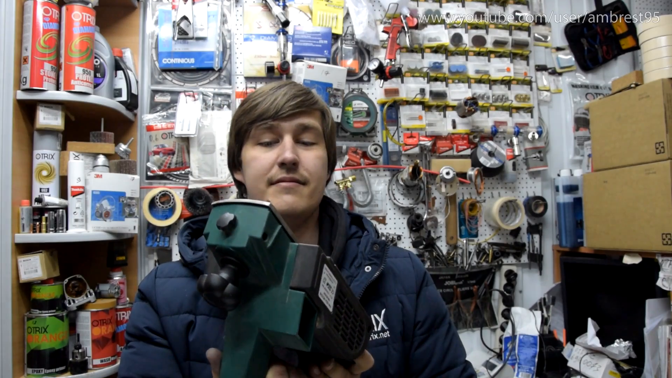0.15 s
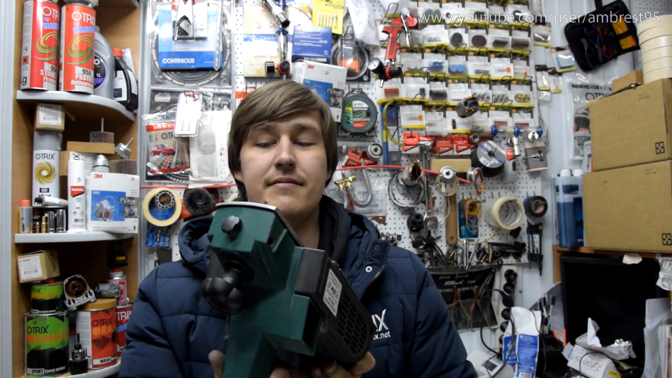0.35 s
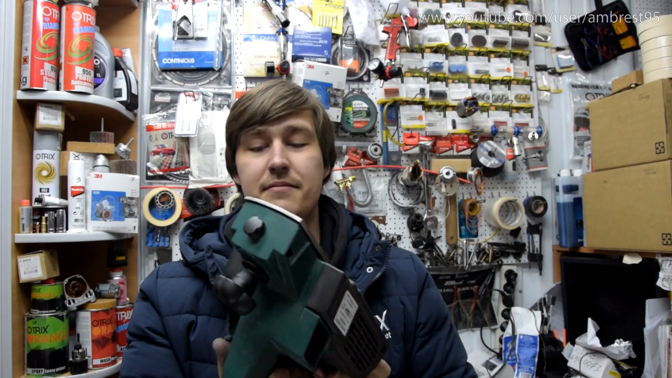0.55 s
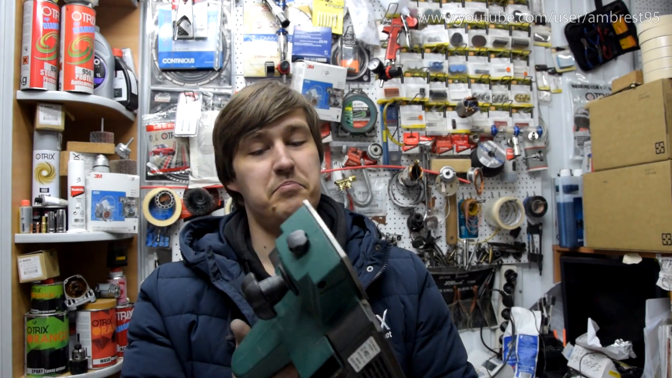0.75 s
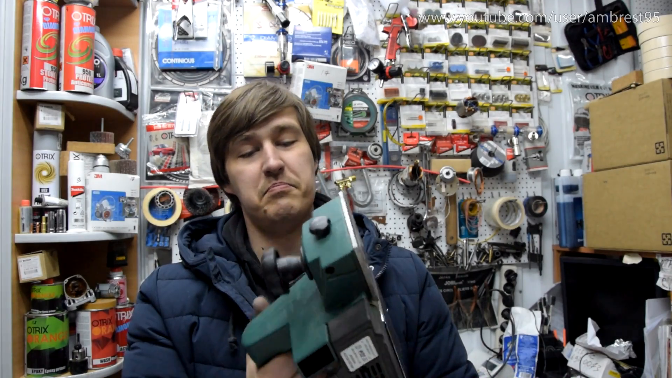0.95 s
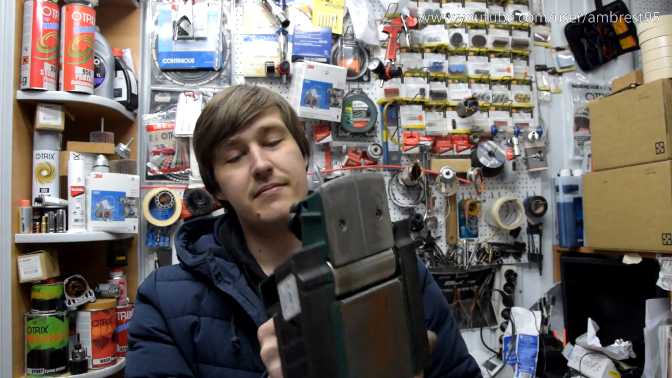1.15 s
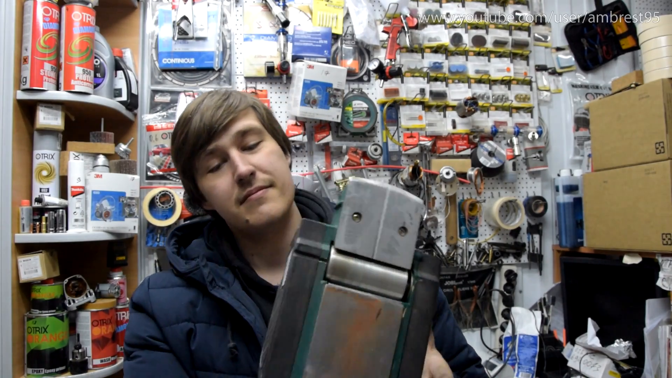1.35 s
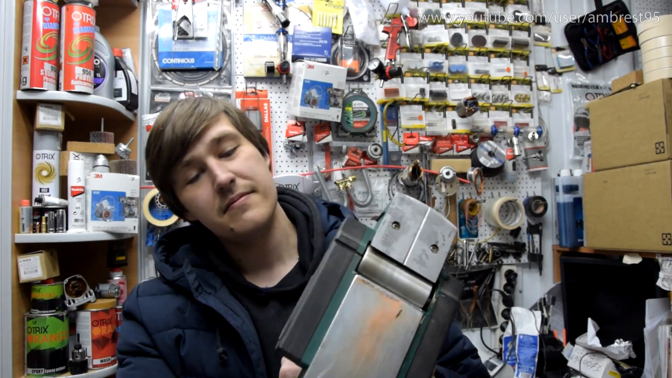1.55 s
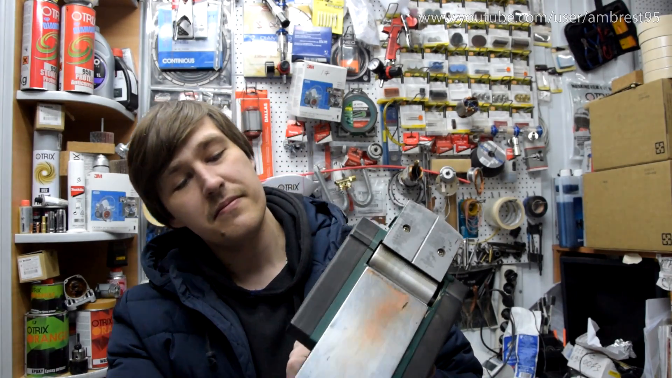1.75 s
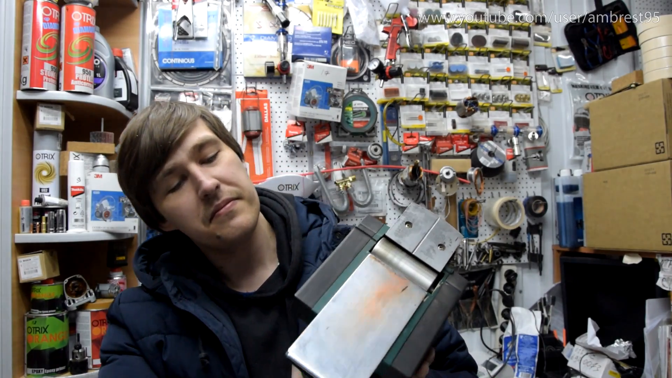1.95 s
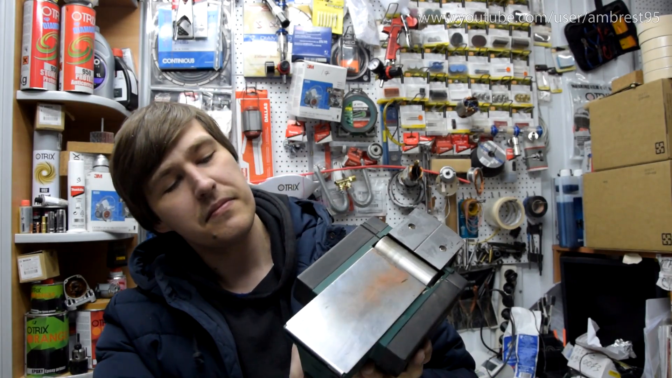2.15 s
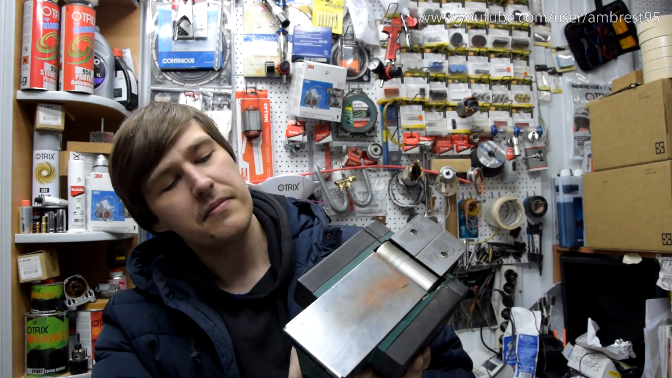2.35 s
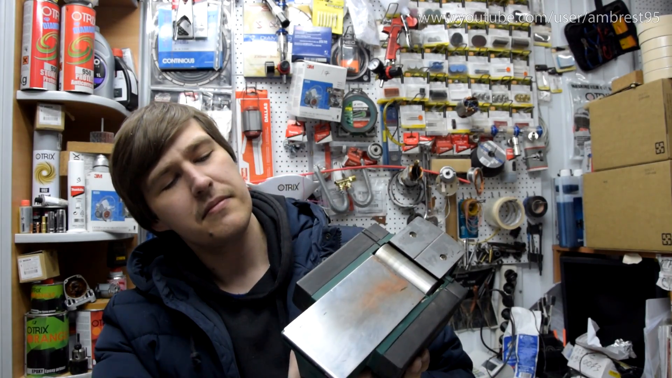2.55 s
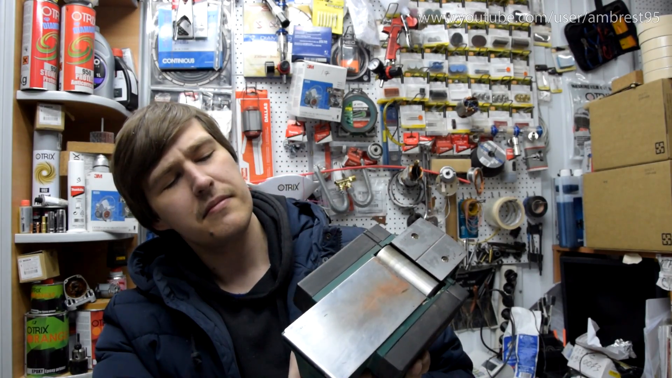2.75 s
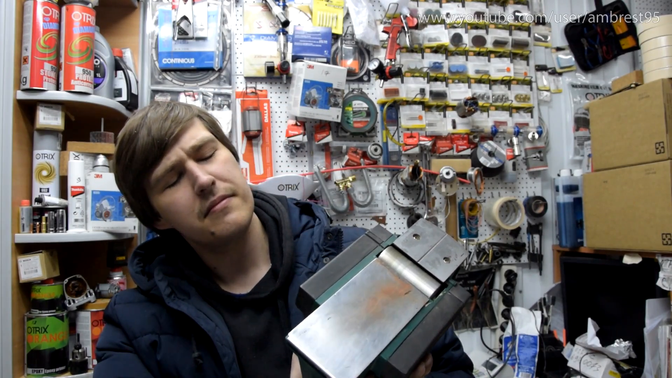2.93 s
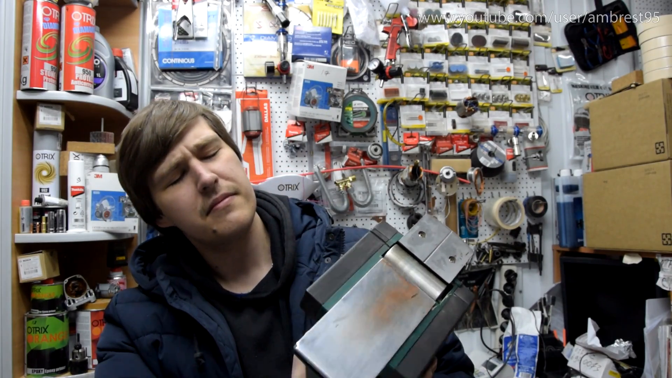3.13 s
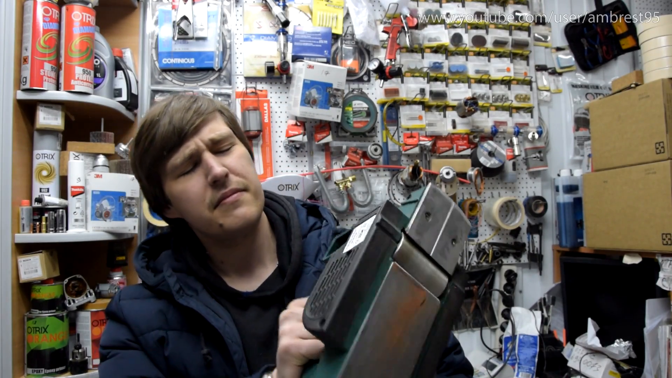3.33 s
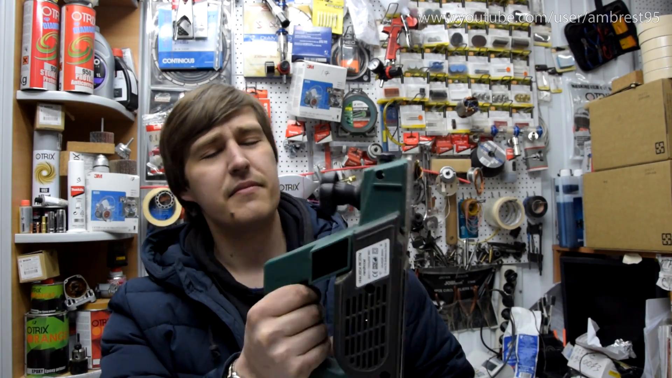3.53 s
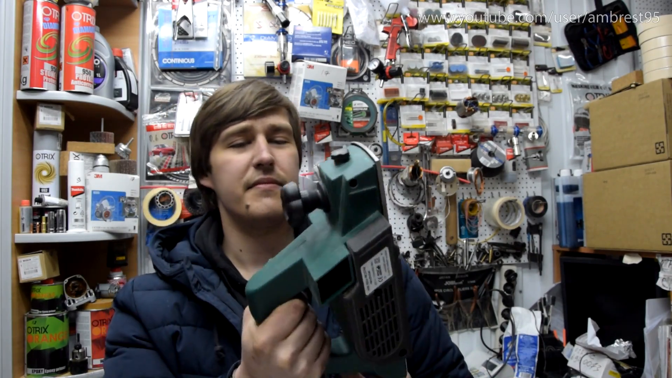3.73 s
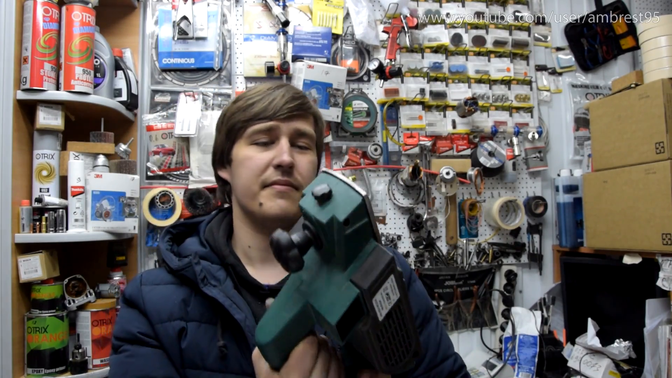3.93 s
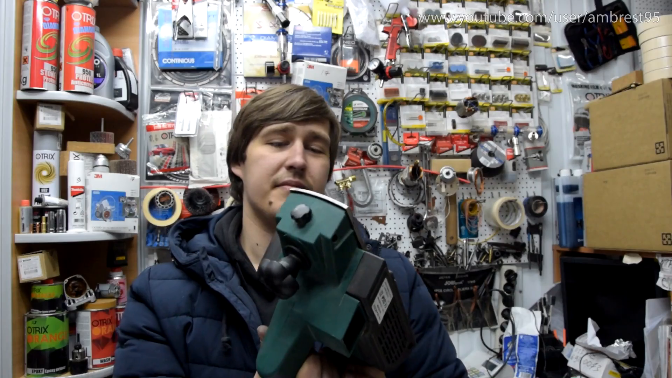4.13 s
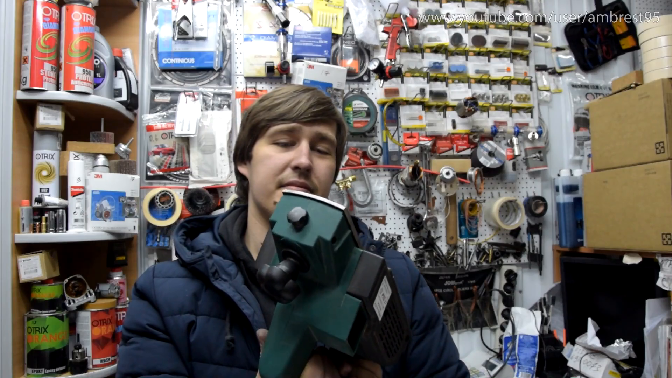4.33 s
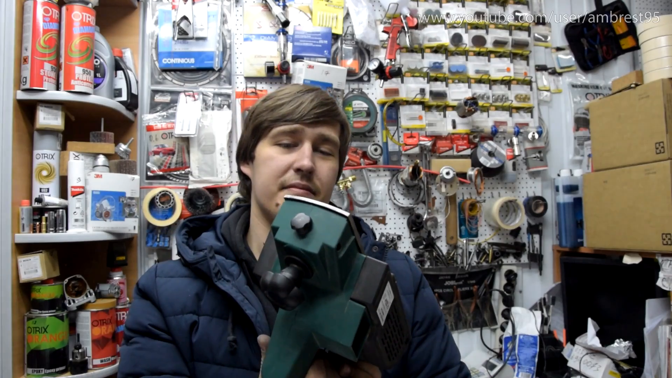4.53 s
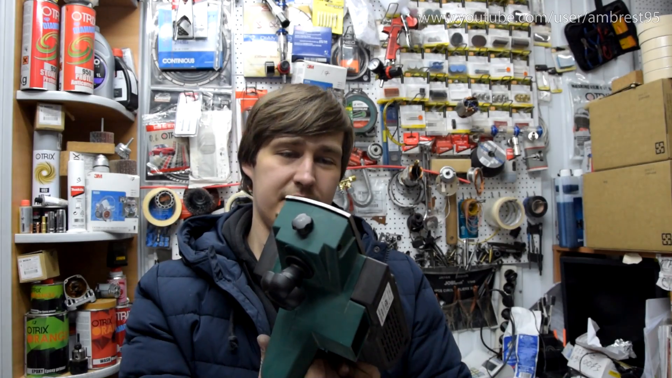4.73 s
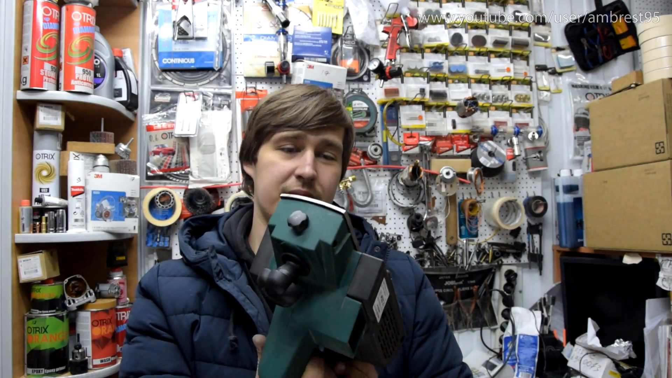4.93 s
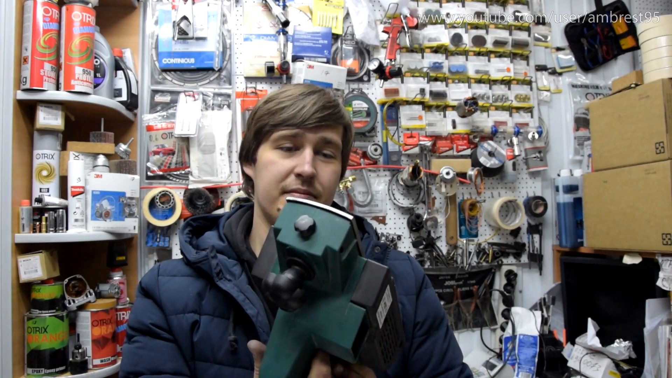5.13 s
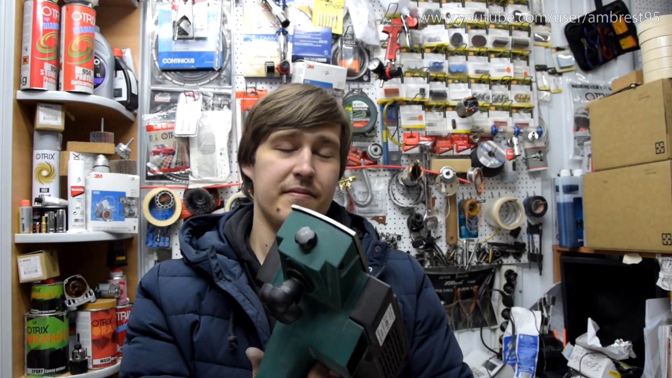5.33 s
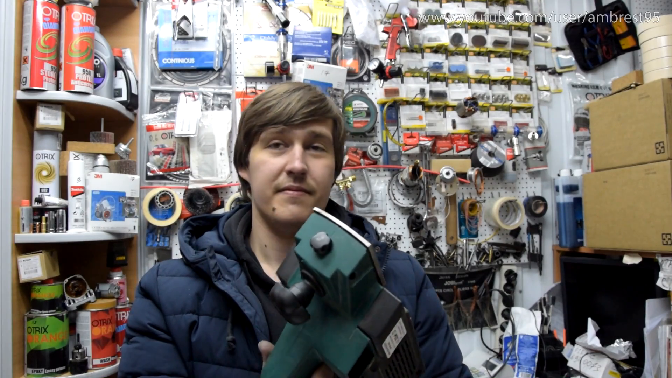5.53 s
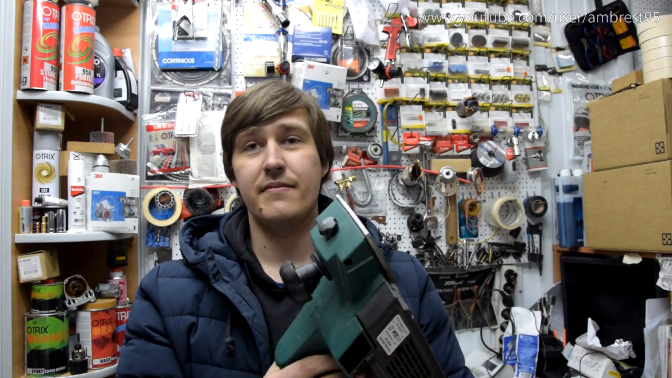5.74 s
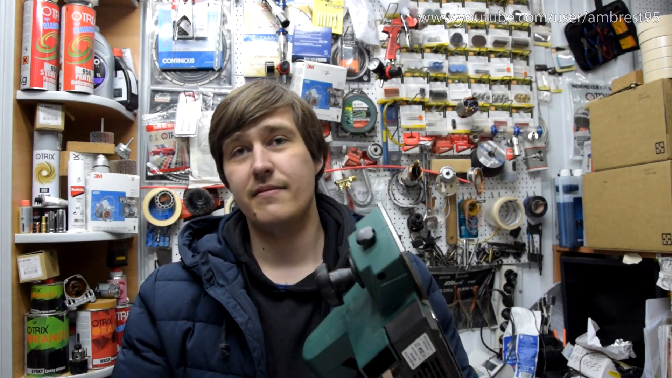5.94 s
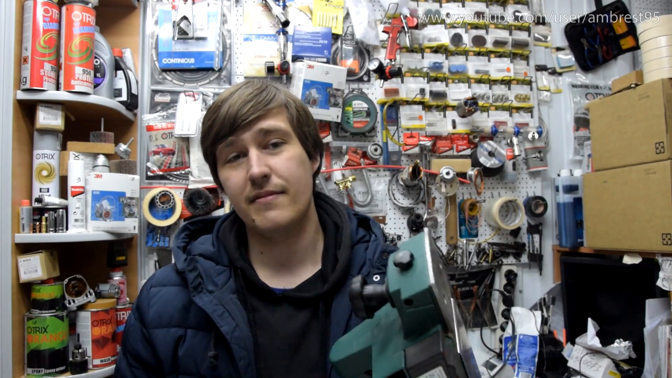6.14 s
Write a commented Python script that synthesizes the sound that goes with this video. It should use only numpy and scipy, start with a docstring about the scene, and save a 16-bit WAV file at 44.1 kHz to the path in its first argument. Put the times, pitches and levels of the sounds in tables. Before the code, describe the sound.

A hand-held electric planer whines loudly close by in a cluttered workshop, its tone shifting as it turns, then clicks off and begins winding down.

```python
"""In a small, crowded workshop an electric hand planer idles close by, is turned about, then is switched off.
It coasts down but is still turning at the end. Its knife drum chops the air into a whine of even partials;
the motor, geared up by a belt, adds rows of lines: hum, slot whistle, weak buzz and brush ticks.
Cooling air is filtered noise, the trigger snaps back as short noise bursts, and near shelves echo the whines."""
import sys
import numpy as np
from scipy import signal
from scipy.fft import rfft, irfft
from scipy.io import wavfile

SR = 44100
rng = np.random.default_rng(int(sys.argv[2]) if len(sys.argv) > 2 else 0)


def materialize(psi):
    """Save the field psi as 16-bit PCM at rate SR to the path in sys.argv[1].

    A 1-D psi becomes a single channel; in a 2-D psi each row is a channel.
    """
    bounded = np.clip(np.atleast_2d(psi).T, -1, 1)
    quanta = np.round(bounded * 32767).astype(np.int16)
    wavfile.write(sys.argv[1], SR, quanta)


N = 276948
TIME = np.arange(N) / SR  # seconds
BINS = np.maximum(np.arange(N // 2 + 1) * SR / N, 1)  # filter frequencies in Hz, kept above zero for the logarithm
CUT_S = 5.007  # the current is cut


def undb(db):
    """Turn decibels into gain."""
    return 10 ** (np.asarray(db) / 20)


def curves(table):
    """Draw each column of a timed table as straight lines, at every sample."""
    s, *columns = np.transpose(table)
    return [np.interp(TIME, s, column) for column in columns]


def colour(points, at=BINS):
    """Gain of a (frequency [Hz], level [dB]) spectrum at the given frequencies."""
    hz, db = np.transpose(points)
    return undb(np.interp(np.log(at), np.log(hz), db))


def shape(x, gain):
    """Filter a sound by one gain for each frequency bin."""
    return irfft(rfft(x) * gain, N)


def noise():
    """Two unrelated white noises of unit power per Hz."""
    return rng.standard_normal((2, N)) * np.sqrt(SR / 2)


def wander(rate):
    """Random levels of unit spread joined by straight lines, `rate` of them a second."""
    levels = rng.standard_normal(size=1024)
    # straight lines shrink the spread, so scale it back up
    return np.interp(TIME * rate, np.arange(len(levels)), levels) * np.sqrt(3 / 2)


def partial(turns, db, flutter_db):
    """A line that follows a shaft angle, its level fluttering in the turbulent air."""
    level = undb(db + flutter_db * wander(25))
    start = rng.random()
    return level * np.sin(2 * np.pi * (turns + start))


def resonance_db(table, at):
    """Lift in dB that resonances of given centre, width and height give at these frequencies or speeds."""
    return sum(db / (1 + (2 * (at - centre) / width) ** 2) for centre, width, db in table)


def drum_speed():
    """Turns per second: a slow warm-up, then drag and dry friction once the current is cut."""
    cold_hz, warm_hz, warm_up_s = 218.5, 239.3, 3.8
    drag_s, friction_hz = 2.91, 133.5  # drag time constant; speed at which dry friction equals drag
    powered = warm_hz - (warm_hz - cold_hz) * np.exp(-np.minimum(TIME, CUT_S) / warm_up_s)
    coasting = np.exp(-np.maximum(TIME - CUT_S, 0) / drag_s)
    return (powered + friction_hz) * coasting - friction_hz


def freewheeling():
    """0 under power, rising to 1 within a twentieth of a second after the current is cut."""
    return np.clip((TIME - CUT_S) * 20, 0, 1)


# How the hands turn the tool: 0 is nose to the microphone, 90 is sole to it
# (time [s], angle [degrees], nearness [dB])
TOOL_POSE = [(0, 18.5, -0.2), (.6, 34, -0.8), (.79, 50, -0.2), (1.1, 46.5, 1), (1.23, 67, 0.6),
             (1.45, 96, .9), (2, 115, 0.84), (2.6, 124.5, 0.5), (3.22, 124.5, 1), (3.38, 96, 3),
             (3.56, 55, 2.5), (3.78, 27, -0.5), (4.17, 6, -1), (4.95, 11.5, 0.06), (5.5, 23, 1.25),
             (6.28, 38, -0.8)]


def beam_db(beam, speed):
    """Level at the microphone: sound leaves by two openings, which add in lobes and cancel between them."""
    db, turn_db, lobe_db, lobe_angle, spacing, octave_db = beam
    angle, near_db = curves(TOOL_POSE)
    second_opening = np.tanh(np.log(undb(lobe_db)))
    lobe_phase = 2 * np.pi * (angle - lobe_angle) / spacing
    lobes = 20 * np.log10(np.abs(1 + second_opening * np.exp(1j * lobe_phase)))
    per_quarter_turn = turn_db * angle / 90
    return db + near_db + per_quarter_turn + lobes + octave_db * np.log2(speed)


# Strong partials of the drum and how each beams around the tool. Multiple of drum speed: beam, where a beam is
# (base level [dB], gain per quarter turn [dB], lobe depth [dB], lobe angle [degrees],
#  lobe spacing [degrees], gain per octave of speed [dB])
DRUM_PARTIALS = {1: (-53.5, 2.5, 5, 85, 150, 32), 2: (-46.5, -1, 11, 31.5, 114, 22),
                 4: (-31.5, -3, 3.5, 63, 69, 15.5), 6: (-40, 11, 1, 150, 160, 12),
                 8: (-23.5, -0.6, 3.5, 33, 57.5, 34), 10: (-43, 11, 4, 20, 64, 16),
                 12: (-36, 0.8, 13, 65, 56, 39), 14: (-42, 8, 4, 13, 46, 17)}
# Air resonances of the drum's chamber (frequency [Hz], width [Hz], lift at full speed [dB])
CHAMBER_RESONANCES = [(215.4, 17.2, 15), (407.7, 78, 18.5), (638, 107, 18), (900.4, 33, 11.5),
                      (1200, 130, 21.5), (1455, 118, 12), (1714, 132, 9.5), (1823.4, 39.8, 12.5)]


def drum_whine(turns, hz, speed):
    """Two knives pass the sole's lip: strong even partials, and a hum from unbalance; high ones flutter more."""
    lag_s = 0.0069  # the chamber takes a moment to ring up and down
    drive = speed ** 0.9  # slow knives ring the chamber less
    rung_hz = np.interp(TIME - lag_s, TIME, hz)
    whine = 0
    for k, beam in DRUM_PARTIALS.items():
        lift_db = drive * resonance_db(CHAMBER_RESONANCES, k * rung_hz)
        whine = whine + partial(k * turns, beam_db(beam, speed) + lift_db, flutter_db=0.06 * k)
    return whine


# How the motor's hum and slot whistle beam around the tool
# (base level [dB], gain per quarter turn [dB], lobe depth [dB], lobe angle [degrees],
#  lobe spacing [degrees], gain per octave of speed [dB])
POLE_HUM_BEAM = (-33.5, 5.5, 4, 70, 101, 33)
SLOT_WHISTLE_BEAM = (-34.5, -5, 4.5, 61.5, 59, -6)
# Critical speeds that make the unpowered armature whistle louder
# (speed [share of full], width [share of full], lift [dB])
CRITICAL_SPEEDS = [(0.65, 0.04, 6.8), (0.559, 0.078, 11.8)]


def motor_whine(turns, speed):
    """Hum of two poles and whistle of twelve rotor slots; the whistle flutters more as it slows."""
    poles, slots, unpowered_db = 2, 12, -5  # without current the slots whistle less
    hum = partial(poles * turns, beam_db(POLE_HUM_BEAM, speed), flutter_db=2.6)
    free_db = unpowered_db + resonance_db(CRITICAL_SPEEDS, speed)
    slot_db = beam_db(SLOT_WHISTLE_BEAM, speed) + freewheeling() * free_db
    return hum + partial(slots * turns, slot_db, flutter_db=2 / speed)


# Weaker partials of the drum (multiple of drum speed, level at full speed [dB])
WEAK_DRUM_LINES = [(3, -38), (5, -31), (7, -39), (9, -39), (16, -43), (18, -39), (20, -46)]
# Weaker partials of the motor (multiple of motor speed, level under power [dB], level freewheeling [dB])
WEAK_MOTOR_LINES = [(1, -40, -60), (3, -37, -47), (4, -36, -41), (5, -41, -44), (6, -39, -48),
                    (7, -35, -36), (8, -43, -43), (9, -41, -41), (10, -43, -41), (11, -41, -45),
                    (14, -48, -39), (16, -50, -49), (17, -50, -47), (24, -48, -43.5), (39, -50, -62)]
# Sum tones, as the belt couples both shafts (drum multiple, motor multiple, level at full speed [dB])
BELT_TONES = [(1, 1, -34.5), (2, 1, -36), (1, 2, -42.5), (1, 3, -32), (6, 1, -35)]


def buzz(drum, motor, speed):
    """Many weak lines: knife and belt tones fade fast with speed, the armature's change without current."""
    def line(turns, db):
        """One weak line with a slow sway and a quick flutter."""
        return partial(turns, db + 2 * wander(3.17), flutter_db=2.0)

    free = freewheeling()
    # the freewheeling armature shakes most near its critical speeds, a little over half of full
    shake_db = -4 * np.minimum(((speed - .6) / .22) ** 2, 1)
    knives = sum(line(round(k) * drum, db) for k, db in WEAK_DRUM_LINES)
    armature = 0
    for k, on_db, off_db in WEAK_MOTOR_LINES:
        level_db = (1 - free) * on_db + free * (off_db + shake_db)
        armature = armature + line(round(k) * motor, level_db)
    belt = sum(line(round(j) * drum + round(k) * motor, db) for j, k, db in BELT_TONES)
    return armature + (knives + belt) * speed ** 6


def brushes(turns, speed):
    """Carbon brushes tick over an uneven commutator, alike each turn: a comb of lines, duller when slow."""
    first, last, slots = 13, 56, 12  # the last multiple is left out
    db, slot_db, sway_db, flutter_db = -49, 1.5, 3, 2.5
    comb = 0
    for k in range(first, last):
        # the comb peaks at multiples of the slot count
        level_db = db + slot_db * np.cos(2 * np.pi * k / slots) + sway_db * wander(4)
        dulling = (first / k) ** (1 / speed)
        comb = comb + dulling * partial(k * turns, level_db, flutter_db)
    return comb / np.sqrt(speed)


# How well the small housing radiates its vibration: little bass, best in the middle
# (frequency [Hz], level [dB])
HOUSING_RADIATION = [(150, -60), (400, -9), (620, 1), (4200, 0), (5600, -3), (9500, -1), (15000, -4)]


def housing(drum, motor, speed):
    """Buzz and brush ticks shake the housing, which passes their vibration on to the air."""
    vibration = buzz(drum, motor, speed) + brushes(motor, speed)
    return shape(vibration, colour(HOUSING_RADIATION))


# Rush of air in chip chute, housing, vents and as fine hiss
# (centre [Hz], base level [dB], gain per quarter turn [dB], lobe depth [dB], lobe angle [degrees],
#  lobe spacing [degrees], gain per octave of speed [dB])
AIR_BANDS = [(650, -1.36, 0.2, 0.78, 96, 92, 7.7), (1800, 0.19, -1, 0.21, 17, 59, 13),
             (4970, -1.06, -1.3, 0.2, 11, 150, 10.8), (10000, -2.6, 3, 1.9, 25, 190, 9.4)]
# Basic spectrum of the rush (frequency [Hz], level [dB per Hz])
AIR_SPECTRUM = [(140, -103), (230, -81.5), (340, -83.5), (400, -74), (500, -74.5), (600, -62.5), (800, -62),
                (1300, -55), (2600, -58), (3500, -66.5), (5500, -70), (10500, -76), (12800, -83),
                (15800, -94)]
# Air resonances of the housing (frequency [Hz], width [Hz], lift [dB])
HOUSING_CAVITIES = [(640, 31, 1), (900, 260, 5.5), (1164, 74, 8.5), (2800, 600, 1), (4130, 1100, 4)]


def air(turns, speed, flicker_db=0.62):
    """Turbulence rings the housing's cavities and is chopped by the two slightly unequal knives."""
    chop, unpowered_db = .11, -2  # depth of each chop [share of level]; drop once the current stops
    gain = colour(AIR_SPECTRUM) * undb(resonance_db(HOUSING_CAVITIES, BINS))
    chopping = np.sin(2 * np.pi * turns) + np.cos(2 * np.pi * 2 * turns)  # once and twice a turn
    rush = noise() * (1 + chop * chopping)
    centres = [row[0] for row in AIR_BANDS]
    out = 0
    # each band is full at its own centre and fades out towards its neighbours
    for share, (_, *beam) in zip(np.eye(len(AIR_BANDS)), AIR_BANDS):
        band = np.interp(np.log(BINS), np.log(centres), share)
        level_db = beam_db(beam, speed) + flicker_db * wander(35)
        out = out + shape(rush, gain * band) * undb(level_db)
    return out * undb(unpowered_db * freewheeling())


# Spectrum of the quiet room (frequency [Hz], level [dB per Hz])
ROOM_SPECTRUM = [(50, -100), (80, -94), (130, -99), (16000, -120)]


def room_tone():
    """Faint steady noise of the room, weakest in the treble."""
    return shape(noise(), colour(ROOM_SPECTRUM))


# The trigger snaps back and its contacts part (time [s], level [dB], decay [s])
TRIGGER_SNAPS = [(5.009, -18.5, 0.0041), (5.015, -25, 0.0038), (5.018, -17.5, 0.0072), (5.033, -26, 0.0063)]
# Balance of the snaps, rescaled to keep their overall level (frequency [Hz], level [dB])
SNAP_SPECTRUM = [(300, -38), (2000, 2), (3500, -3), (6000, -3.5), (9500, -16), (13000, -22)]


def switch():
    """A quick cluster of plastic snaps: noise bursts that start at once and die away."""
    force = 0
    for s, db, decay in TRIGGER_SNAPS:
        force = force + undb(db) * (TIME >= s) * np.exp(-np.abs(TIME - s) / decay)
    gain = colour(SNAP_SPECTRUM)
    return shape(force * rng.standard_normal((2, N)), gain / np.sqrt(np.mean(gain ** 2)))


def shelves(x, t60, wet_db):
    """Direct sound plus dense short echoes: mid, and the side that only echoes make."""
    t = TIME[:SR // 2]
    decay = np.exp(-np.log(1000) * t / t60)  # falls by 60 dB in t60 seconds
    echoes = rng.standard_normal((2, len(t))) * decay * (t > .002)
    echoes /= np.sqrt(np.sum(echoes ** 2, axis=1, keepdims=True))
    mid, side = signal.fftconvolve(x[None], echoes, axes=1)[:, :N]
    wet = undb(wet_db)
    return np.array([(x + wet * mid) / np.hypot(1, wet), side])


# Width of the sound at the two microphones (frequency [Hz], gain of the side [dB])
STEREO_WIDTH = [(150, -60), (350, -34), (1400, -18.5), (5600, -12), (14000, -4.5)]
# Lean of the sound to the left (frequency [Hz], left gain over right gain [dB])
STEREO_LEAN = [(500, -.2), (1400, 1.1), (5600, 1.3), (10000, 2.7), (14000, .7)]


def scene():
    """Both shafts follow one speed; everything is mixed as mid and side, then spread to left and right."""
    hz = drum_speed() * (1 + .0003 * wander(12))
    speed = hz / hz.max()  # share of full speed
    drum = np.cumsum(hz) / SR  # turns so far
    # the slower it runs, the more the slack belt lets the armature rock, which frays its high lines
    rocking = .014 * (1 - speed) * wander(110)
    motor = 1.7612 * drum + rocking  # the belt gears the motor up
    # the open drum is heard directly; the enclosed motor and the housing arrive more by way of the shelves
    lines = (shelves(drum_whine(drum, hz, speed), t60=0.13, wet_db=-26)
             + shelves(motor_whine(motor, speed), t60=0.13, wet_db=-15)
             + shelves(housing(drum, motor, speed), t60=0.13, wet_db=-7))
    mid, side = lines + air(drum, speed) + room_tone() + switch()
    side = shape(side, colour(STEREO_WIDTH))
    lean = np.sqrt(colour(STEREO_LEAN))  # half the lean on each channel
    return np.array([shape(mid + side, lean), shape(mid - side, 1 / lean)])


def record(dry):
    """A steep low-pass filter removes the treble above its corner."""
    top_hz = 15800
    return signal.sosfilt(signal.ellip(10, .2, 80, top_hz, fs=SR, output="sos"), dry)


dry = scene()
out = record(dry)
materialize(out)
```